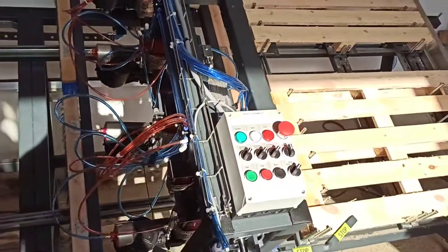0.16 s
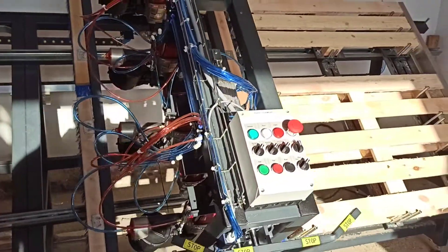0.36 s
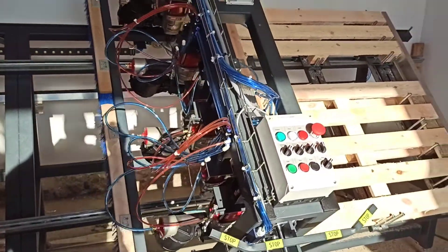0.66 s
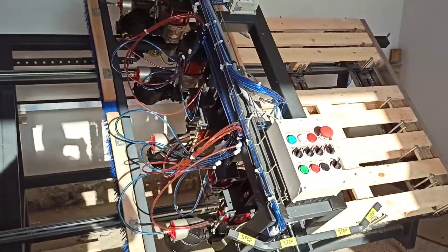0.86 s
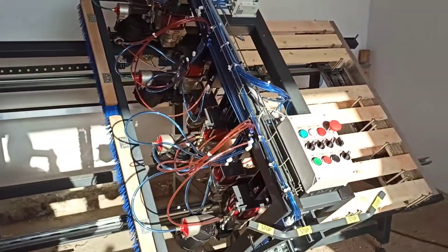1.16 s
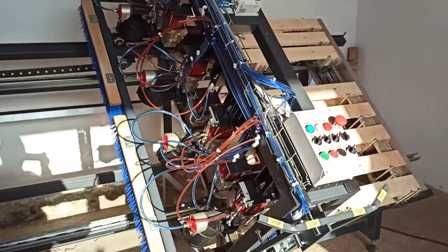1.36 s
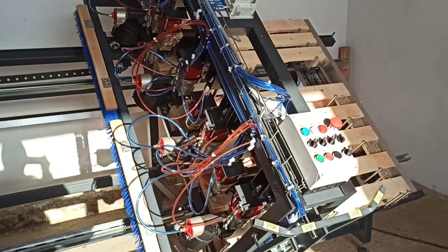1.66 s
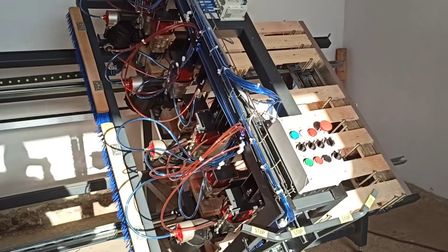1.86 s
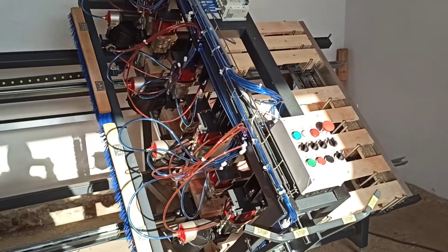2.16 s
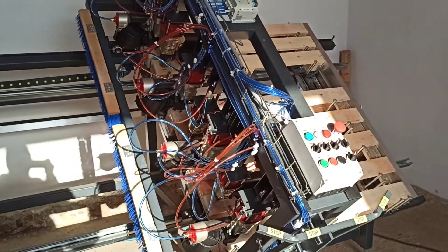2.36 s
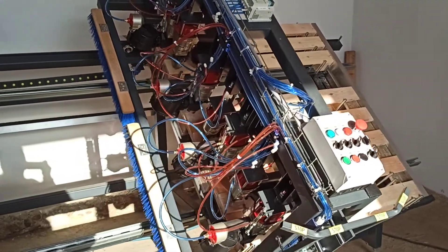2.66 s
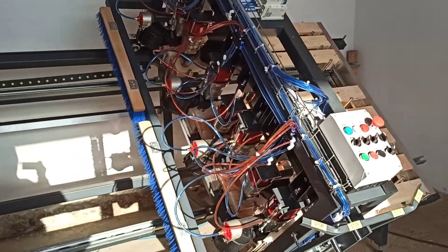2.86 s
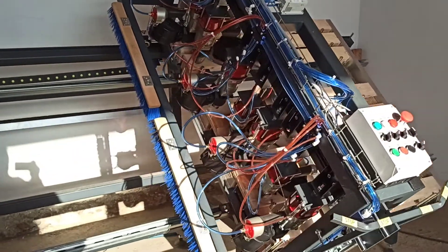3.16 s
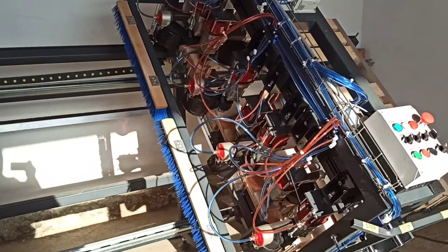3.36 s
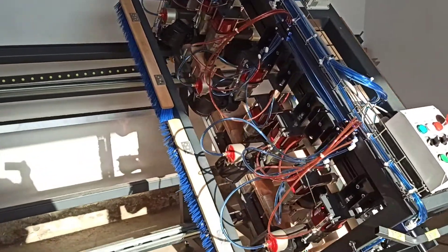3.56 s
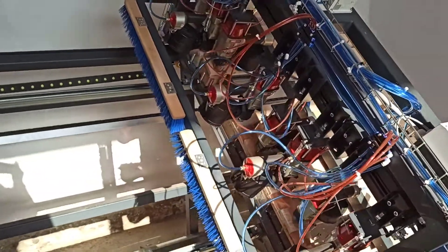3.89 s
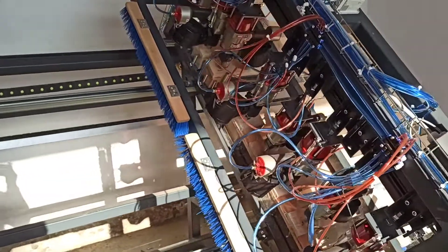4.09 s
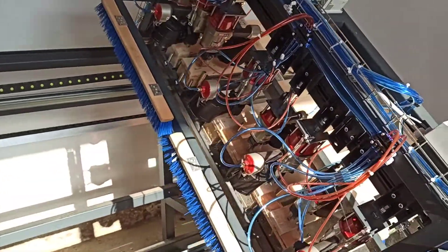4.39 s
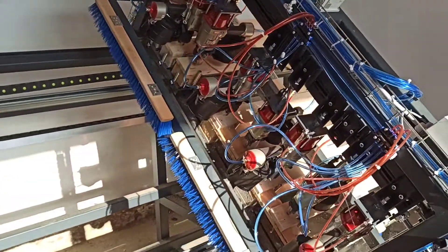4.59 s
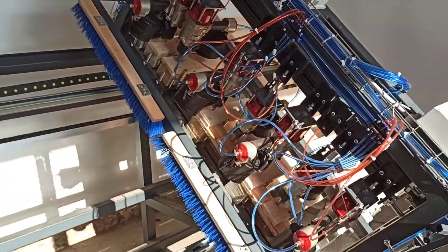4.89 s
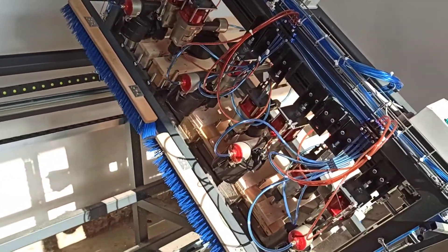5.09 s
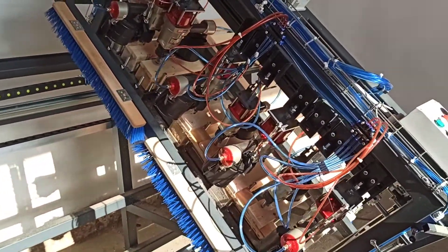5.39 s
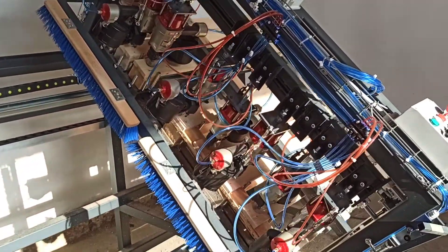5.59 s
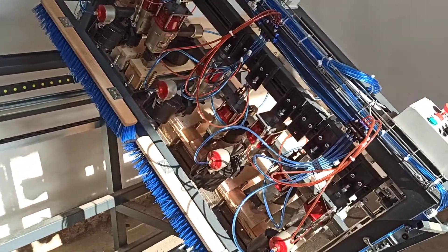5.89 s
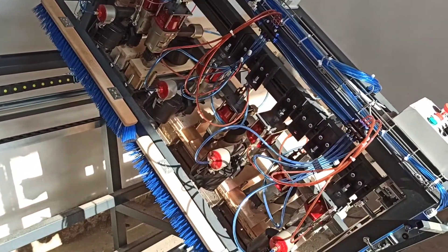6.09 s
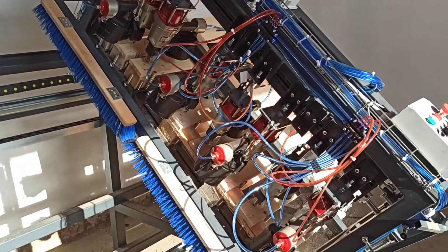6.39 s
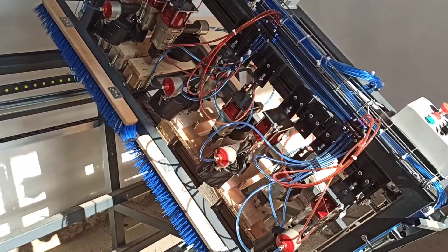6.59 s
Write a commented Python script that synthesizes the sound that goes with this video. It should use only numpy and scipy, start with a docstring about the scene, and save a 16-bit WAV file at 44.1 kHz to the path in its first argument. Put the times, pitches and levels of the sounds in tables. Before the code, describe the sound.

Pneumatic valves clunk and vent sharply between two dense, clipping bursts of hammered nails that ring a steel frame, over rolling carriage clatter.

```python
"""A pneumatic pallet-nailing machine fires two volleys of nail guns, heard from beside its gantry.
Each volley is a dense rattle of blows, loud enough to clip, that rings the steel frame and blows off air.
Valves thump ringing blocks and vent shaped noise; clamps chatter on the boards; a carriage rolls on rails.
At the start a pallet rumbles along a conveyor that soon runs down, over squeaks, motor hum and leaking air.
The loud work fills a hard-walled workshop with a diffuse tail whose treble dies first."""
import sys
import numpy as np
from scipy import signal
from scipy.fft import rfft, irfft, next_fast_len
from scipy.io import wavfile

SR = 44100
rng = np.random.default_rng(int(sys.argv[2]) if len(sys.argv) > 2 else 0)


def put_to_file(sound):
    """Save the sound as 16-bit audio at rate SR, in the file named by the first command-line argument."""
    columns = np.atleast_2d(sound).T  # one column per channel
    safe = np.clip(columns, -1, 1)
    whole_steps = np.round(safe * 32767)
    wavfile.write(sys.argv[1], SR, whole_steps.astype(np.int16))


N = 297234
TIME = np.arange(N) / SR

# Nail volleys. Each row: start in seconds, level in dB.
VOLLEYS = [(3.826, -2.8), (6.067, -2.5)]
VOLLEY_RISE_S, VOLLEY_HOLD_S, VOLLEY_T60_S, VOLLEY_SAG_DB_PER_S = 0.023, 0.14, 0.51, 18
# Colour of the nail blows. Each row: frequency in Hz, density in dB per Hz.
NAILING = [(25, -33), (70, -13), (160, -3.5), (400, -4), (750, 2), (1400, -0.2), (2300, -5.5), (4000, -3.5),
           (7000, -4), (12000, -7), (15500, -11)]
# Modes of the steel frame. Each row: frequency in Hz, height in dB, T60 in seconds.
FRAME = [(183.4, -1, 0.89), (293.4, -4, 1.8), (524.7, 4.5, 0.44), (784.4, 8, 0.79), (1010, -19, 0.32),
         (1382, 6, 0.61), (1608, -1, 0.39), (1750, -9, 0.43), (2030, -6, 0.63)]
# The guns blow off as their pistons return, a set delay after each volley starts.
BLOW_OFF_DELAY_S, BLOW_OFF_DB, BLOW_OFF_RISE_S, BLOW_OFF_HOLD_S, BLOW_OFF_T60_S = 0.19, -3.5, 0.0062, 0.13, 0.5
# Colour of the guns' exhaust ports. Each row: frequency in Hz, density in dB per Hz.
GUN_PORT = [(40, -10), (200, 0.5), (1000, -22), (2200, -8), (4000, -0.5), (7000, 2.5), (12000, 1.5),
            (15500, 0)]
# Left-right balance of the guns. Each row: frequency in Hz, left over right in dB.
GUN_BALANCE = [(200, -0.5), (700, 2.5), (1300, 4), (4400, 0), (15000, -4.5)]

# Valve spools slamming over. Each row: start in seconds, thump in dB, spit of air in dB.
SPOOLS = [(2.437, -16.5, -7), (3.235, -20.5, -9.5), (3.808, -12, -10.5), (4.576, -18, -5.5),
          (5.482, -19, -8.5), (6.052, -13, -20)]
# Modes of the valve block. Each row: frequency in Hz, height in dB, T60 in seconds.
VALVE_BLOCK = [(196, -13, 0.17), (295, -2.5, 0.077), (335, -6.5, 0.097), (659, -11, 0.082),
               (2290, -32, 0.081), (2430, -25, 0.031), (3920, -19, 0.046)]
# Valves venting nearby. Each row: start in seconds, level in dB, hold in seconds, fade T60 in seconds.
VENTS = [(2.441, -14, 0.095, 0.29), (2.795, -20, 0.019, 0.38), (3.238, -10, 0.48, 0.45),
         (4.523, -20.5, 0.037, 0.24), (4.582, -15, 0.077, 0.41), (4.822, -28.5, 0.029, 0.37),
         (4.966, -26, .056, 0.57), (5.486, -10, 0.49, 0.67)]
VENT_RISE_S, VENT_SAG_DB_PER_S = 0.0073, 6
# Colour of air through the silencer. Each row: frequency in Hz, density in dB per Hz.
SILENCER = [(60, -27), (300, -17), (1400, -9.5), (2500, -5.5), (3500, -3.5), (5000, -3.5), (6800, -1),
            (8300, 3.5), (12300, -5), (13400, 2), (15500, 0.5)]
# The silencer's cavity singing in the jet. Each row: frequency in Hz, level in dB, width in Hz.
SILENCER_MODES = [(3595, -18, 220), (3786, -17.5, 240), (4645, -20.5, 63), (6276, -23, 25),
                  (6804, -15, 230), (13400, -19, 250), (14400, -12.5, 410)]
# The first, harsher rush through an opening valve: level in dB for a one-second hold, and its fade.
SURGE_DB, SURGE_T60_S = 4.5, 0.18
# Colour of that rush. Each row: frequency in Hz, density in dB per Hz.
SURGE = [(300, -31), (1400, -32), (2400, -4), (3600, 4), (4600, 6), (6000, 5), (15000, -21)]
# A cylinder shuddering as it starts.
# Each row: start in seconds, level in dB, rise in seconds, hold in seconds, fade T60 in seconds.
SHUDDER = [(2.44, -28, 0.0092, 0.065, 0.2)]
# Left-right balance of the valves. Each row: frequency in Hz, left over right in dB.
VALVE_BALANCE = [(200, 2), (1300, 5), (2400, 2), (7000, -0.5), (15000, -5)]

# Clamps landing on the boards. Each row: start in seconds, level in dB, chatter T60 in seconds.
CLAMPS = [(2.584, -20.5, 0.49), (3.388, -23, 2.96), (4.916, -23.5, 0.62), (5.64, -21, 2.84)]
# Colour of knocked boards. Each row: frequency in Hz, density in dB per Hz.
BOARDS = [(50, -32), (170, -1), (280, -5), (520, -0.5), (760, 2), (1020, -5.5), (1350, -4), (1750, -18.5),
          (4000, -23), (12000, -26)]

# Carriage moves along the gantry. Each row: start in seconds, rolling level in dB, length in seconds.
CARRIAGE_MOVES = [(2.462, -32, 0.37), (3.86, -16.5, 0.56), (4.556, -25, 0.12), (6.087, -16.5, 0.57)]
CARRIAGE_RISE_S, CARRIAGE_COAST_T60_S = 0.065, 0.82
# Colour of wheels on rails. Each row: frequency in Hz, density in dB per Hz.
ROLLING = [(40, -26), (75, -23), (140, -4), (190, -3.5), (300, -0.5), (620, -3.5), (1000, -11),
           (2200, -14.5), (4000, -12.5), (7000, -13.5), (14000, -21.5)]
# The drive swells up after each volley starts, then fades slowly.
DRIVE_DELAY_S, DRIVE_DB, DRIVE_RISE_S, DRIVE_HOLD_S, DRIVE_T60_S = 0.15, -32.5, 0.35, 0.57, 5
# Tones of the drive. Each row: frequency in Hz, level in dB, width in Hz.
DRIVE_TONES = [(184, -8, 14), (237, -4, 7), (304, -9.5, 10), (790, -13.5, 25)]

# The conveyor is running at the start, stops, and its rollers spin out.
CONVEYOR_DB, CONVEYOR_RUN_S, CONVEYOR_T60_S = -35, 1.486, 1.5
# Colour of the rollers' rumble. Each row: frequency in Hz, density in dB per Hz.
RUMBLE = [(30, -28), (70, -18), (120, -1.5), (190, 0.5), (320, -4), (500, -7), (900, -12), (1300, -24.5),
          (4000, -25), (14000, -74)]
# Tones of the running conveyor. Each row: frequency in Hz, level in dB against its rumble, width in Hz.
CONVEYOR_TONES = [(316.4, -13.5, 11), (742, -16.5, 22), (6430, -23, 24)]
# A roller groaning harder as the load passes. Each row: start in seconds, level in dB, length in seconds.
GROANS = [(1.07, -41, 0.33), (1.336, -33, 0.23)]
GROAN_DB = -9.5  # steady groan, against the conveyor's running level

# Air released deep in the machine.
# Each row: start in seconds, level in dB, rise in seconds, hold in seconds, fade T60 in seconds.
FAR_VENTS = [(.70, -26.5, 0.094, 0.9, 0.75), (2.76, -27, 0.012, 0.058, 0.78), (4.96, -33, 0.043, 0.1, 0.46)]
# Colour of an open jet. Each row: frequency in Hz, density in dB per Hz.
OPEN_JET = [(60, -27), (300, -8), (1000, 1), (2000, 1), (4000, 3), (7000, 1.5), (8500, -0.5), (12000, -4),
            (15500, -6.5)]

# Rollers squeaking. Each row: start in seconds, length in seconds, frequency in Hz, level in dB.
SQUEAKS = [(0.098, .2, 2180, -52.5), (0.45, 0.19, 2175, -50.5), (.01, 0.28, 3187, -54),
           (0.39, 0.32, 3187, -57)]
# Light ticks in the mechanism. Each row: start in seconds, level in dB.
TICKS = [(2.13, -27)]

# Motor hum and drive whine. Each row: frequency in Hz, rms level in dB, width in Hz.
HUM = [(101, -44.5, 10.3), (188.3, -50.5, 18), (11960, -56.5, 50)]
# Fittings leaking under pressure. Each row: start in seconds, level in dB, length in seconds.
LEAKS = [(0, -42, 5.0), (1.828, -38.5, 0.43)]
LEAK_RISE_S, LEAK_T60_S = 0.036, 1.0
WORKSHOP_DB = -47.5  # steady floor
# Colour of the floor and the leaks. Each row: frequency in Hz, density in dB per Hz.
WORKSHOP = [(25, -30), (60, 5), (110, 8), (200, 6.5), (450, 2), (1200, 2), (2300, 0.5), (3700, 3),
            (7000, -0.5), (12000, -1), (15500, -12.5)]

HALL_T60_S, HALL_TREBLE_T60_S = 0.99, 0.27
# Likeness of the two channels. Each row: frequency in Hz, likeness from 0 to 1.
LIKENESS = [(40, 0.3), (120, 1), (350, 0.93), (800, 0.39), (1600, 0), (14000, 0)]
SPREAD_LIKENESS = 0.6  # share of that likeness left to sources spread along the gantry
# Overall colour. Each row: frequency in Hz, gain in dB.
OVERALL_COLOUR = [(15, -28), (70, -1.5), (4550, 0), (4900, -6.5), (5800, -6), (6300, 4), (6800, 5),
                  (7550, 4.5), (7800, -1.5), (8550, -6.5), (8850, -31.5), (11350, -57), (11600, -7),
                  (15700, -6)]
CUTOFF_HZ = 15900


def nail_guns():
    """A row of drivers hammers nails into the wood, the frame rings, and the guns blow off."""
    force = together(swell(s, db, VOLLEY_RISE_S, VOLLEY_HOLD_S, VOLLEY_T60_S, VOLLEY_SAG_DB_PER_S)
                     for s, db in VOLLEYS)
    blows = rattle(force, NAILING, per_s=200, t60=0.06, spread_db=6, likeness=SPREAD_LIKENESS)
    shaken = force * rng.standard_normal((2, N))
    frame = from_db(-57.5) * ring(shaken, FRAME)
    blow_off = together(swell(s + BLOW_OFF_DELAY_S, BLOW_OFF_DB, BLOW_OFF_RISE_S, BLOW_OFF_HOLD_S,
                              BLOW_OFF_T60_S, sag_db_per_s=2) for s, _ in VOLLEYS)
    exhaust = blow_off * noise(GUN_PORT, likeness=SPREAD_LIKENESS)
    return aim(blows + frame, GUN_BALANCE) + exhaust * pan(-0.55)


def valves():
    """Each spool thumps its block and spits; vented air surges, then rushes through the silencer."""
    knocks, spit = np.zeros(N), np.zeros(N)
    for s, thump_db, spit_db in SPOOLS:
        knocks[round(s * SR)] = from_db(thump_db)
        # a short puff, strongest 7.5 ms after the thump
        spit += from_db(spit_db) * np.exp(-((TIME - s - 0.0075) / 0.0047) ** 2)
    venting = together(swell(s, db, VENT_RISE_S, hold, t60, VENT_SAG_DB_PER_S) for s, db, hold, t60 in VENTS)
    flutter = from_db(0.5 * narrow(0, 50))
    jet = (venting + spit) * flutter
    # the longer a valve vents, the stronger its first surge
    surge = together(hold * swell(s, db + SURGE_DB, VENT_RISE_S, 0.021, SURGE_T60_S)
                     for s, db, hold, _ in VENTS)
    near = among_beams(noise(SILENCER)[0], echo_db=-7, reach_s=0.004)
    diffuse = noise(SILENCER)
    air = from_db(-4.5) * near + from_db(-2.5) * diffuse + resonant(SILENCER_MODES, likeness=0.048)
    rush = surge * noise(SURGE)
    thumps = ring(knocks, VALVE_BLOCK)
    shudder = flow(SHUDDER, sag_db_per_s=3) * narrow(310, 86)
    return aim(jet * air + rush + thumps + shudder, VALVE_BALANCE)


def clamps():
    """A clamp lands with a knock that dies fast and a chatter on the boards that dies more slowly."""
    force = 0
    for s, db, t60 in CLAMPS:
        knock, chatter = dying(TIME - s, 0.07), dying(TIME - s, t60)
        force = force + from_db(db) * (TIME >= s) * (chatter + knock)
    return rattle(force, BOARDS, per_s=300, t60=0.055, spread_db=7) * pan(4.2)


def carriage():
    """The carriage clatters along its rails and coasts to rest; its drive drones on after each volley."""
    moving = together(swell(s, db, CARRIAGE_RISE_S, length, CARRIAGE_COAST_T60_S)
                      for s, db, length in CARRIAGE_MOVES)
    wheels = rattle(moving, ROLLING, per_s=200, t60=0.12, spread_db=5, likeness=SPREAD_LIKENESS)
    driven = together(swell(s + DRIVE_DELAY_S, DRIVE_DB, DRIVE_RISE_S, DRIVE_HOLD_S, DRIVE_T60_S)
                      for s, _ in VOLLEYS)
    return wheels * pan(-0.27) + driven * resonant(DRIVE_TONES, likeness=0.94)


def conveyor():
    """Rollers rumble, sing and groan under the pallet, then die away as the conveyor stops."""
    running = from_db(CONVEYOR_DB) * dying(TIME - CONVEYOR_RUN_S, CONVEYOR_T60_S)
    rumble = rattle(running, RUMBLE, per_s=83, t60=0.21, spread_db=3.5)
    singing = running * resonant(CONVEYOR_TONES, likeness=0.72)
    harder = sum(from_db(db) * arch(s, length) for s, db, length in GROANS)
    groan = (from_db(GROAN_DB) * running + harder) * narrow(163.0, 30)
    return rumble + singing + groan


def far_air():
    """Open jets behind the gantry, made as a diffuse rush that leans right."""
    return flow(FAR_VENTS, sag_db_per_s=3.0) * noise(OPEN_JET) * pan(-3.5)


def small_sounds():
    """Dry rollers squeak as wavering tones in short swells, and the mechanism ticks."""
    squeaks = sum(from_db(db) * arch(s, length) * narrow(hz, 5.8) for s, length, hz, db in SQUEAKS)
    ticks = sum(from_db(db) * (TIME >= s) * dying(TIME - s, 0.012) for s, db in TICKS)
    return squeaks + ticks * noise(BOARDS)


def background():
    """Motors hum and whine, and fittings leak a little air over a steady noise floor."""
    hum = resonant(HUM, likeness=0.7)
    leaks = [swell(s, db, LEAK_RISE_S, length, LEAK_T60_S) for s, db, length in LEAKS]
    hiss = together([from_db(WORKSHOP_DB), *leaks]) * noise(WORKSHOP)
    return hum + hiss * pan(-3)


def among_beams(x, echo_db, reach_s):
    """A source arrives directly and, on each channel, by ten random reflections off the steel beams."""
    paths = np.zeros((2, SR // 20))
    paths[:, 0] = 1
    for side in paths:
        draws = rng.random((10, 2))
        delays = 1 + (draws[:, 0] * min(reach_s, 1 / 21) * SR).astype(int)
        side[delays] += from_db(echo_db) * (2 * draws[:, 1] - 1)
    paths = paths / np.sqrt(np.sum(paths ** 2, axis=1, keepdims=True))
    return signal.fftconvolve(np.atleast_2d(x), paths, axes=1)[:, :N]


def hall(x):
    """Diffuse reverberation, split at 7 kHz so that the treble dies first."""
    t = TIME[:SR]
    wash = noise([(20, 0), (20000, 0)], size=SR)
    low = signal.sosfilt(signal.butter(2, 7000, fs=SR, output="sos"), wash)
    high = signal.sosfilt(signal.butter(2, 7000, "high", fs=SR, output="sos"), wash)
    # the bands are subtracted because they are in opposite phase at the split
    tail = low * dying(t, HALL_T60_S) - high * dying(t, HALL_TREBLE_T60_S)
    tail = tail * np.minimum(t / 0.0059, 1)
    return signal.fftconvolve(x, tail / np.sqrt(np.sum(tail ** 2) / 2), axes=1)[:, :N]


def rattle(force, spectrum, per_s, t60, spread_db, likeness=1):
    """Uneven contacts, scaled by the force, each feed a decaying energy that shapes coloured noise."""
    count = int(N / SR * per_s)
    draws = rng.random((count, 2))
    # one contact at a random point in each equal slot of time
    at = ((np.arange(count) + draws[:, 0]) * (N - 1) / count).astype(int)
    contacts = np.zeros(N)
    contacts[at] = from_db(spread_db * draws[:, 1])
    keep = dying(1 / SR, t60) ** 2
    power = (rms_one(contacts) * force) ** 2 + 1e-18
    energy = signal.lfilter([1 - keep], [1, -keep], power)
    return np.sqrt(energy) * noise(spectrum, likeness=likeness)


def ring(drive, modes):
    """Damped modes, each a two-pole resonator ringing at its own height after a unit click."""
    out = 0
    for hz, db, t60 in modes:
        r, w = dying(1 / SR, t60), 2 * np.pi * hz / SR
        mode = signal.lfilter([0, np.sin(w)], [1, -2 * r * np.cos(w), r * r], drive + 1e-18)
        out = out + from_db(db) * mode
    return out


def resonant(modes, likeness):
    """Stereo noise held in narrow resonances of (Hz, rms dB, width Hz): wavering tones."""
    grid = 2 * next_fast_len(N // 2 + 1)
    bins, power = np.fft.rfftfreq(grid, 1 / SR), 0
    for hz, db, width in modes:
        peak = 1 / (1 + (2 * (bins - hz) / width) ** 2) ** 2
        power = power + from_db(db) ** 2 * peak / peak.mean()
    mid, side = irfft(white(grid) * np.sqrt(power / 2))[:, :N]
    return stereo(mid, side, likeness)


def narrow(hz, width_hz):
    """A wavering tone from narrow-band noise, or at 0 Hz a slow drift; rms 1."""
    grid = 2 * next_fast_len(N // 2 + 1)
    offset = (np.fft.rfftfreq(grid, 1 / SR) - hz) / (width_hz / 2)
    return rms_one(irfft(rfft(rng.standard_normal(grid)) / (1 + offset ** 2))[:N])


def noise(spectrum, size=N, likeness=1):
    """Diffuse stereo noise, its channels' likeness set by frequency; rms 1."""
    grid = 2 * next_fast_len(size // 2 + 1, True)
    mid, side = white(grid)
    both = stereo(mid, side, likeness * at_hz(LIKENESS, grid))
    return rms_one(irfft(both * from_db(at_hz(spectrum, grid)))[:, :size])


def white(grid):
    """Spectra of two unrelated white noises."""
    return rng.standard_normal((2, grid + 2)).view(complex) * np.sqrt(grid / 2)


def stereo(mid, side, likeness):
    """Mix two unrelated noises into left and right with the given likeness."""
    alike = np.clip(likeness, 0, 1)
    return np.sqrt(1 + alike) * mid + np.sqrt(1 - alike) * np.array([side, -side])


def flow(rows, sag_db_per_s):
    """A valve opens, the pressure sags while it holds, then the line empties."""
    return together(swell(*row, sag_db_per_s) for row in rows)


def swell(s, db, rise, hold, t60, sag_db_per_s=0):
    """Gain that rises at time s, sags while it holds, then dies away."""
    first, last = np.searchsorted(TIME, [s, s + hold + 2 * t60])
    t, gain = TIME[first:last] - s, np.zeros(N)
    level = from_db(db - sag_db_per_s * np.minimum(t, hold))
    gain[first:last] = level * np.minimum(t / rise, 1) * dying(t - hold, t60)
    return gain


def arch(s, length):
    """Gain that comes and goes in one rounded arch."""
    return np.sin(np.pi * np.clip((TIME - s) / length, 0, 1)) ** 0.5


def dying(t, t60):
    """1 until time 0, then 60 dB down every t60, as far as 600 dB."""
    return np.exp(-np.log(1000) * np.clip(t / t60, 0, 10))


def together(gains):
    """Unrelated sounds add in power."""
    return np.sqrt(sum(gain ** 2 for gain in gains))


def aim(x, balance):
    """Left-right difference that changes with frequency."""
    left = colour(x[0], [(hz, db / 2) for hz, db in balance])
    right = colour(x[1], [(hz, -db / 2) for hz, db in balance])
    return np.array([left, right])


def pan(db):
    """Channel gains for a left-right difference; positive leans left."""
    return from_db(np.array([[db], [-db]]) / 2)


def colour(x, spectrum):
    """Causal, minimum-phase filter with the given spectrum, built by folding its cepstrum."""
    size = 2 * next_fast_len(x.shape[-1] // 2 + 2048)
    cepstrum = irfft(np.log(from_db(at_hz(spectrum, size))))
    cepstrum[1:size // 2] *= 2
    cepstrum[size // 2 + 1:] = 0
    return irfft(rfft(x, size) * np.exp(rfft(cepstrum)))[..., :x.shape[-1]]


def at_hz(points, size):
    """A table over log frequency, read on an FFT grid."""
    hz, value = np.transpose(points)
    grid_hz = np.fft.rfftfreq(size, 1 / SR) + 1  # 1 Hz up, to keep the log finite
    return np.interp(np.log(grid_hz), np.log(hz), value)


def from_db(db):
    """Decibels to an amplitude factor."""
    return np.exp(np.asarray(db) * (np.log(10) / 20))


def rms_one(x):
    """Scale to an rms of 1."""
    return x / np.sqrt(np.mean(x ** 2) + 1e-20)


def scene():
    """Guns, clamps and valves also fill the hall; small sounds and background stay free of echoes."""
    blows = among_beams(clamps() + nail_guns(), echo_db=-17, reach_s=0.014)
    rolling = among_beams(conveyor() + carriage() + far_air(), echo_db=-17, reach_s=0.02)
    machine = valves() + blows
    direct = from_db(-0.8) * machine
    reverberant = from_db(-5.5) * hall(machine) * pan(-3.4)
    return direct + reverberant + rolling + small_sounds() + background()


def record(dry):
    """Overall colour: a peak near 7 kHz and a gap from 9 to 11 kHz; peaks clip; the top is cut."""
    clipped = np.clip(colour(dry, OVERALL_COLOUR), -0.95, 0.95)
    return signal.sosfilt(signal.ellip(10, 0.1, 70, CUTOFF_HZ, fs=SR, output="sos"), clipped)


dry = scene()
out = record(dry)
put_to_file(out)
```